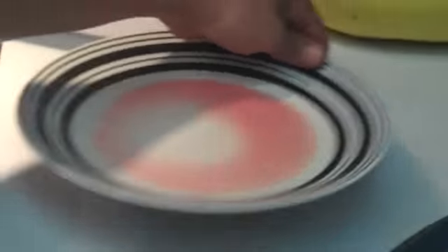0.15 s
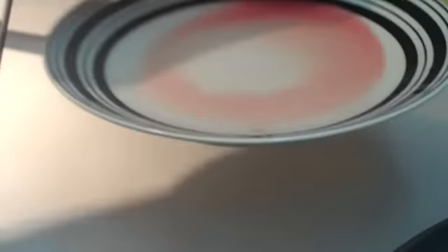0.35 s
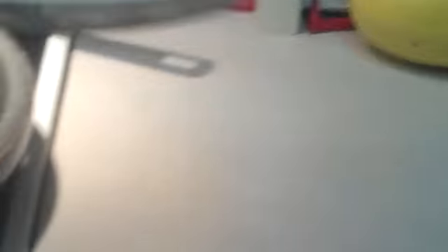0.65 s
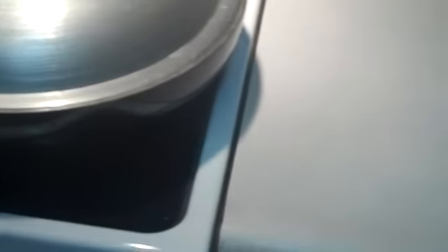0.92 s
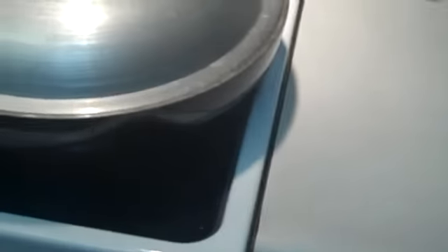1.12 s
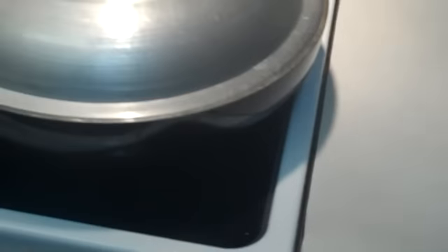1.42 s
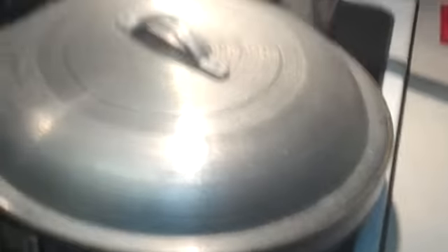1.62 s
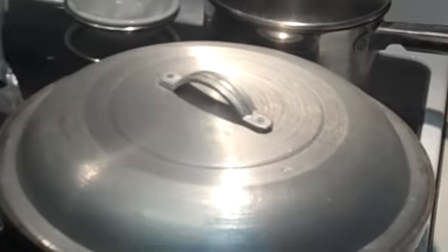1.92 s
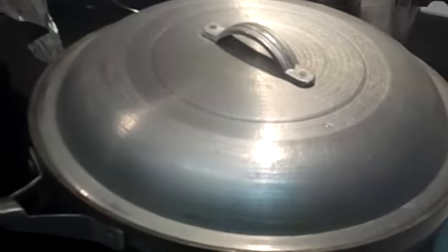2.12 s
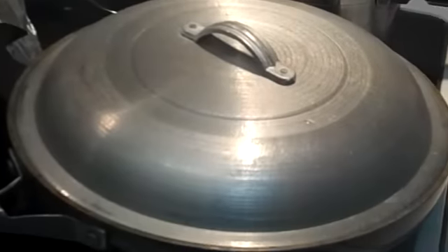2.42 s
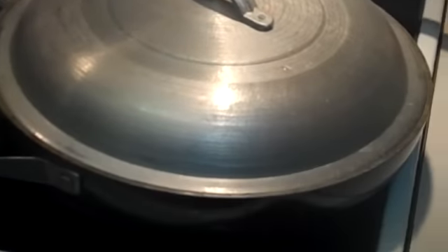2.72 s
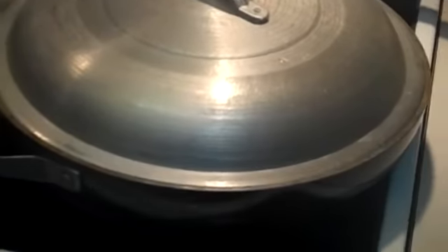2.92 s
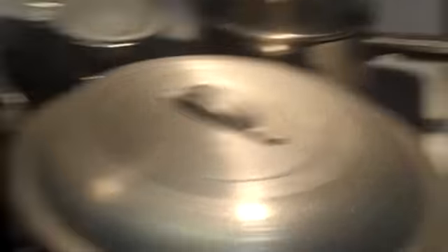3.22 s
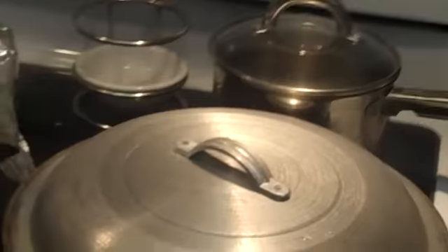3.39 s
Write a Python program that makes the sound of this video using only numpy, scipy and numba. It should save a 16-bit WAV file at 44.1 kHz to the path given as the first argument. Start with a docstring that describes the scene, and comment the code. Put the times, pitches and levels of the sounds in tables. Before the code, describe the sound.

Fish sizzles steadily in a lidded pan, with irregular pops and sharp fat spits, in a small kitchen. Light crockery knocks come early; a loud double plate clang lands near the end. Close phone microphone, dull highs.

```python
"""Fish fries under a metal lid in a small kitchen, heard by one phone microphone.
From the start: a dense fizz of noise and tiny bubbles, larger bubbles that pop as rising, dying sines, noise
puffs of spitting fat and dull knocks of crockery (resonated noise); a low sine hum comes and goes, handling
rumble fades, a fan hums faintly. Near the end a plate is set down with a double clang of damped modes."""
import sys
import numpy as np
from scipy import signal
from scipy.fft import rfft, irfft
from scipy.io import wavfile
from scipy.ndimage import uniform_filter1d
from numba import njit

SR = 44100
rng = np.random.default_rng(int(sys.argv[2]) if len(sys.argv) > 2 else 0)


def linear_from_db(decibels):
    """Turn decibels (scalar or array-like) into linear amplitude factors; 0 gives 1."""
    return 10 ** (np.asarray(decibels, float) / 20)


def master_out(mix):
    """Clip the mix to full scale and print it as 16-bit PCM to the path in sys.argv[1]."""
    frames = np.transpose(np.atleast_2d(mix))
    ceiling = np.clip(frames, -1, 1)
    pcm = np.round(ceiling * 32767).astype(np.int16)
    wavfile.write(sys.argv[1], SR, pcm)


N = 156555
T = np.arange(N) / SR
FRAME = dict(window="cosine", nperseg=2048, noverlap=1024)


def column(table, at, log=False):
    """Interpolate the second column of a table over its first, on a log axis if asked."""
    x, y = np.array(table, float).T[:2]
    if log:
        return np.interp(np.log(at + 1), np.log(x + 1), y)
    return np.interp(at, x, y)


def unit(x):
    """Scale to rms 1."""
    return x / np.sqrt(np.mean(x ** 2))


def band(x, hz, width_hz):
    """Resonance with gain 1 at its centre."""
    return signal.lfilter(*signal.iirpeak(hz, hz / width_hz, SR), x)


def band_twice(x, hz, width_hz):
    """The same resonance passed twice: steeper skirts."""
    return band(band(x, hz, width_hz), hz, width_hz)


def fade(t, t60_s):
    """Exponential decay that starts at t = 0."""
    return (t >= 0) * linear_from_db(-60 * np.maximum(t, 0) / t60_s)


def walk(rate_hz, count=N):
    """Random levels held 1 / rate_hz and slewed; spread about 1.8."""
    hold = int(SR / rate_hz)
    levels = np.repeat(rng.standard_normal(count // hold + 2), hold)
    return 1.78 * uniform_filter1d(levels, hold // 3)[rng.integers(hold):][:count]


@njit
def bubbles(start, hz, t60_s, size, glide):
    """Each bubble is a dying sine whose pitch rises by the share glide over its t60."""
    out = np.zeros(N)
    for k in range(len(start)):
        n, phase = int(t60_s[k] * SR), 0.
        for i in range(min(n, N - start[k])):
            phase += 2 * np.pi * hz[k] * (1 + glide * i / n) / SR
            out[start[k] + i] += size[k] * np.sin(phase) * 10 ** (-3 * i / n)
    return out


def fizz():
    """Hiss and tiny bubbles in the colour of the lidded pot; narrow patches sink far but swell only a little."""
    # colour of the fizz: pitch_hz, gain_db
    colour = [(65, -51.5), (120, -27), (204, -10), (258, -13), (340, -19), (420, -12), (539, -12.5),
              (586, -14), (700, -6.5), (1310, -8.5), (1400, -10.5), (1740, -8), (2430, -6.5), (3000, -5.5),
              (3500, -6.5), (4600, -4.5), (5280, 2.5), (6000, -5), (7800, -32.5), (13200, -120)]
    # how hard the oil fries: start_s, relative level_db
    frying = [(0, -41.5), (.24, -40.5), (.4, -43), (.52, -43), (.8, -40), (.88, -42.5), (1.05, -41),
              (1.18, -43), (1.5, -40.5), (1.58, -43.5), (1.74, -40.5), (1.84, -39.5), (2.0, -40.5),
              (2.1, -41), (2.28, -41.5), (2.44, -40.5), (2.66, -42), (2.78, -41), (2.9, -42.5),
              (3.55, -40.5)]
    tiny_per_s, tiny_spread_db, tiny_db, tiny_cycles = 900, 2.2, -4.5, 5
    flicker_db, flicker_width_hz, surge_db, surge_rate_hz = 5, 260, 1.8, 25

    place, pitch, rarity = rng.random((int(tiny_per_s * N / SR), 3)).T
    hz = 500 * 13 ** pitch
    size = linear_from_db(-tiny_spread_db * np.log(rarity + 0.007))
    tiny = bubbles((place * N).astype(np.int64), hz, tiny_cycles / hz, size, 0.59)

    # flatten the bubbles' average spectrum
    f, _, tiny_spec = signal.stft(tiny, SR, **FRAME)
    average = np.sqrt(uniform_filter1d(np.mean(abs(tiny_spec) ** 2, 1), size=20))
    tiny_spec = tiny_spec / average[:, None] * (f > 500)[:, None]

    hiss_spec = signal.stft(rng.standard_normal(N), SR, **FRAME)[2]
    hiss_spec = hiss_spec / np.sqrt(np.mean(abs(hiss_spec) ** 2))
    patch = rng.standard_normal(hiss_spec.shape)[(f / flicker_width_hz).astype(int)]
    hiss_spec = hiss_spec * linear_from_db(flicker_db * np.minimum(patch, .7))

    spec = (hiss_spec + linear_from_db(tiny_db) * tiny_spec) * linear_from_db(column(colour, f, True))[:, None]
    level_db = column(frying, T) + 3 + surge_db * np.tanh(walk(surge_rate_hz))
    return unit(signal.istft(spec, SR, **FRAME)[1][:N]) * linear_from_db(level_db)


def pops():
    """Each large bubble bursts as a snap, a main ring, three neighbours just after and a short bright splash."""
    # bursts: start_s, level_db, pitch_hz, t60_s
    bursts = [(0.0154, -37.5, 3070, 0.012), (0.0316, -28, 2910, 0.02), (0.0858, -26, 2065, 0.026),
              (0.1656, -30.5, 3310, 0.036), (0.5897, -28, 2266, 0.022), (0.6516, -33, 1840, 0.025),
              (0.7888, -35, 1980, 0.024), (0.9834, -32, 2100, 0.014), (1.05, -33.5, 1780, 0.025),
              (1.4573, -32, 2728, 0.067), (1.494, -27, 1970, 0.027), (1.6222, -24.5, 2440, 0.012),
              (1.6397, -30, 1883, 0.051), (1.6931, -29, 2825, 0.013), (1.7506, -26, 2210, 0.008),
              (1.9644, -27.5, 1812, 0.041), (2.1366, -25, 2075, 0.025), (2.167, -27, 2920, 0.011),
              (2.387, -26, 2316, 0.026), (2.4344, -37, 2120, 0.033), (2.5063, -26, 2120, 0.021),
              (2.539, -33.5, 1925, 0.024), (2.5805, -33, 2190, 0.039), (2.7003, -31.5, 2010, 0.011),
              (2.753, -23, 2120, 0.027), (2.9544, -25.5, 2120, 0.033), (3.0869, -26.5, 2685, 0.021),
              (3.1296, -26, 3250, 0.021), (3.155, -24, 1830, 0.028), (3.482, -30, 2120, 0.025),
              (3.5313, -28, 2830, 0.0091)]
    glide, snap_db, snap_cycles = 0.075, -0.7, 3.5
    cluster_s, cluster_spread = 0.0065, .22
    splash_db, splash_t60_s, splash_hz = -8.5, .06, 3220
    after_fizz_hz, after_fizz_db = 5400, -6.5

    s, db, hz, t60_s = np.array(bursts).T
    start = (s * SR).astype(np.int64)
    ring = bubbles(start, hz, t60_s, linear_from_db(db), glide)
    ring += bubbles(start, 1.15 * hz, snap_cycles / hz, linear_from_db(db + snap_db), glide)
    for late, off in rng.random((3, 2, len(s))):
        near_start = ((s + cluster_s * late) * SR).astype(np.int64)
        near_hz = hz * (1 + cluster_spread * (3 * off - 1))
        ring += bubbles(near_start, near_hz, t60_s * 0.69, linear_from_db(db - 2.5), glide)

    splash = sum(linear_from_db(d + splash_db) * fade(T - a, splash_t60_s) for a, d in zip(s, db))
    noise = rng.standard_normal(N)
    bright = unit(band(noise, splash_hz, 4000.0))
    bright = bright + linear_from_db(after_fizz_db) * unit(band(noise, after_fizz_hz, 720.0))
    return ring + splash * bright


def spits():
    """Fat spits against the lid: each spit is a sharp puff of noise round its own centre."""
    # spits: start_s, level_db, centre_hz
    puffs = [(0.163, -23.5, 5420), (0.2416, -28.5, 5360), (0.3192, -34, 5400), (0.7595, -27.5, 5160),
             (0.8006, -24.5, 5400), (1.0859, -28, 5530), (1.2308, -30, 5280), (1.3882, -30, 5100),
             (1.5772, -29, 4620), (1.639, -22, 5120), (1.7013, -20.5, 5280), (1.8731, -27, 5960),
             (2.0617, -26, 4880), (2.137, -26.5, 4770), (2.3254, -25, 5180), (2.3825, -31, 5160),
             (2.5043, -23.5, 4550), (2.5381, -19.5, 5110), (2.7503, -20.5, 4860), (2.8557, -22, 5200),
             (2.8948, -29, 5100), (3.0856, -29.5, 4100)]
    t60_s, width_hz, crest_db = 0.029, 1300, 5.5
    noise = rng.standard_normal(N)
    return sum(linear_from_db(db - crest_db) * fade(T - s, t60_s) * unit(band(noise, hz, width_hz))
               for s, db, hz in puffs)


def knocks():
    """Handled crockery: short bursts of noise through broad low resonances."""
    # knocks: start_s, level_db, t60_s
    strokes = [(0.035, -29.5, 0.13), (0.063, -32, 0.19), (0.553, -24, 0.091), (0.818, -32, 0.11),
               (1.316, -40, 0.18), (1.697, -28, 0.095), (1.757, -31.5, 0.056), (3.065, -35.5, 0.18)]
    # what they ring with: pitch_hz, width_hz (of one of two passes), level_db
    resonances = [(188, 84, -2.5), (292, 28, -6.5), (517, 130, -1.5), (702, 120, 4.5), (946, 100, 2.5),
                  (1170, 440, 1.5)]
    noise = rng.standard_normal(N)
    body = unit(sum(linear_from_db(db) * unit(band_twice(noise, hz, w)) for hz, w, db in resonances))
    return body * sum(linear_from_db(db - 5) * fade(T - s, t60_s) for s, db, t60_s in strokes)


def clang():
    """Each plate contact tops up the modes with its own weights; they waver and buzz over a rattle and a thud."""
    # plate touches, lands, rocks and lands again: start_s, level_db, push_s
    contacts = [(3.224, -31, 0.00005), (3.239, -15, 0.00025), (3.243, -11.5, 0.00012),
                (3.253, -11.5, 0.00011), (3.255, -13, 0.000097), (3.276, -21, 0.0001),
                (3.296, -12, 0.000086), (3.310, -16, 0.00018), (3.328, -18.5, 0.00016),
                (3.343, -23.5, 0.0002)]
    # modes of plate and worktop: pitch_hz, level_db, t60_s, rocked_db (change once on its other edge)
    modes = [(170, -14, .3, 1), (226.2, -9.5, 0.18, 1.5), (269.7, -3, .22, -6), (305.5, -7, 0.42, -5),
             (385.4, -2.5, 0.19, -3), (401, -2, 0.25, -1.5), (440, -9.5, .2, -0.5), (465, -8, .3, 1),
             (503.5, -4.5, 0.22, 4.5), (542.4, -8, 0.17, 4.5), (689, -0.7, .36, 0), (724, -10, 0.22, 1),
             (818, -8, 0.25, 0.5), (931, -8, 0.24, 1.5), (1116, -0.5, 0.38, 1), (1490, -9.5, 0.52, -0.5),
             (1517, -11, 0.23, 1.5), (1665, -9.5, 0.26, 1), (1780, -4.5, 0.17, 0), (2120, -4, 0.17, -2),
             (2190, -5, 0.22, 0), (2414, -4.5, 0.11, -3), (2720, -4.5, 0.27, -6), (2860, -12, .25, 5),
             (2990, -6, .25, -0.5), (3440, -11, .3, 7), (3820, -15, .2, 11), (4511, -7, .25, 1.5),
             (4860, -4.5, 0.25, -3.5), (4970, -5.5, 0.097, -2), (5173, -3, .13, -12), (5400, -5, .17, -5),
             (5960, -7, .15, -7)]
    rocked_s, damped_s, damped_t60_s = 3.285, 3.41, 0.058
    rattle_db, rattle_t60_s, rattle_hz = -18.5, 0.1, 1000
    thud_hz, thud_db, thud_t60_s = 35, -47.5, 0.96
    waver_db, waver_rate_hz, rise_s = 3.5, 69.7, 0.00076
    buzz_db, buzz_width = -1.2, .11  # against the tone; share of the mode's pitch

    first = int(contacts[0][0] * SR)
    t = T[first:]
    rattle = unit(band_twice(rng.standard_normal(len(t)), rattle_hz, 3000.0))
    out = sum(linear_from_db(db + rattle_db) * fade(t - s, rattle_t60_s) for s, db, push_s in contacts) * rattle

    rise = 1 / (rise_s * SR)
    for hz, mode_db, t60_s, rocked_db in modes:
        decays = []
        for weight, (s, db, push_s) in zip(rng.standard_normal(len(contacts)), contacts):
            hit = linear_from_db(db + 1.56 * weight + rocked_db * (s > rocked_s))
            softness = 1 + (hz * push_s) ** 2  # a longer push excites high modes less
            decays.append(hit / softness * fade(t - s, t60_s))
        env = signal.lfilter([rise], [1, rise - 1], np.max(decays, axis=0))
        buzz = unit(band_twice(rng.standard_normal(len(t)), hz, buzz_width * hz))
        waver = linear_from_db(waver_db * walk(waver_rate_hz, count=len(t)))
        tone = waver * np.sin(2 * np.pi * (hz * t + rng.random()))
        out += linear_from_db(mode_db - 14.0) * env * (tone + linear_from_db(buzz_db) * buzz)

    thud = unit(band(rng.standard_normal(len(t)), thud_hz, 40.))
    out += linear_from_db(thud_db) * fade(t - contacts[2][0], thud_t60_s) * thud
    damping = linear_from_db(-60 * np.maximum(t - damped_s, 0) / damped_t60_s)
    return np.r_[np.zeros(first), out * damping]


def low_hum():
    """A low sine that switches on and off with smoothed edges."""
    # spells: start_s, length_s, rms_db
    spells = [(0.153, 0.27, -67), (0.41, 0.093, -63.5), (0.615, 0.092, -66.5), (0.75, 0.04, -63),
              (0.92, 0.051, -66), (1.01, 0.033, -61.5), (1.074, 0.13, -65), (1.32, 0.052, -64),
              (2.819, 0.04, -66.5)]
    hum_hz = 47.3
    gate = sum(linear_from_db(db) * ((T > s) & (T < s + length_s)) for s, length_s, db in spells)
    return np.sqrt(2) * np.sin(2 * np.pi * hum_hz * T) * uniform_filter1d(gate, size=700)


def rumble():
    """The phone being handled: low noise of randomly wavering level."""
    # level before the wavering: start_s, rms_db
    handling = [(0, -62.5), (.5, -64.5), (1.2, -68), (1.5, -87.5), (3.55, -85.5)]
    noise = unit(band(rng.standard_normal(N), 129, 92.0))
    return noise * linear_from_db(column(handling, T) + 2.9 * walk(9.5))


def fan():
    """Fan tones: narrow noise bands, so they waver."""
    # tones: pitch_hz, width_hz (of one of two passes), rms_db
    tones = [(211.2, 34, -62.5), (418.2, 25, -63.5)]
    return sum(linear_from_db(db) * unit(band_twice(rng.standard_normal(N), hz, w)) for hz, w, db in tones)


def kitchen(hits):
    """Add the room's tail, decaying low-passed noise, then tilt the spectrum."""
    room_t60_s, room_db, room_top_hz = .2, -13.5, 4070
    t = T[:SR // 2]
    tail = signal.lfilter(*signal.butter(1, room_top_hz, fs=SR), rng.standard_normal(len(t)))
    tail = tail * fade(t - .004, room_t60_s)
    wet = signal.fftconvolve(hits, tail / np.sqrt(np.sum(tail ** 2)))[:N]
    tilt = [(30, -17.5), (150, -1.5), (6500, -2.0), (9000, -16.0)]  # pitch_hz, gain_db
    gain = linear_from_db(column(tilt, np.fft.rfftfreq(N, 1 / SR), True))
    return irfft(rfft(hits + linear_from_db(room_db) * wet) * gain, N)


def scene():
    """Short sounds get the kitchen's tail; steady ones are heard as they are."""
    hits = pops() + spits() + knocks() + clang()
    return (kitchen(hits) + fizz() + low_hum() + rumble() + fan())[None]


def spectral_gate(x):
    """Parts weaker than their spectral neighbourhood drop, leaving thin flickering tones; the top is shut."""
    gate_db, gate_depth_db, gate_low_hz, gate_top_hz = -1.5, -19.5, 110, 6166
    hole_db, hole_depth_db = -4, -19  # wider weak patches, in quiet moments only
    loud_db, loud_eases = 9, 0.22  # loud: above the bin's median; share of the depth left there

    f, _, z = signal.stft(x, SR, **FRAME)
    near, patch = (np.sqrt(uniform_filter1d(abs(z) ** 2, size=k, axis=0)) for k in (40, 9))
    quiet = near < linear_from_db(loud_db) * np.median(near, axis=1)[:, None]
    weak = abs(z) < linear_from_db(gate_db) * near
    hole = (patch < linear_from_db(hole_db) * near) * quiet
    gain_db = gate_depth_db * weak * np.where(quiet, 1, loud_eases) + hole_depth_db * hole
    gain_db *= (f > gate_low_hz)[:, None]
    top_hz = gate_top_hz + 150 * rng.standard_normal(z.shape[1])
    gain_db = gain_db - 64 * (f[:, None] > top_hz)
    return signal.istft(z * linear_from_db(gain_db), SR, **FRAME)[1][:N]


def self_noise(x):
    """Faint coloured hiss whose level wavers and rises with the sound."""
    # colour: pitch_hz, gain_db
    colour = [(30, -17), (300, -0.5), (6500, 4.5), (7800, 1.5), (8600, -13), (9200, -59)]
    level_db, follows = -59, 0.46
    gain = linear_from_db(column(colour, np.fft.rfftfreq(N, 1 / SR), True))
    hiss = irfft(rfft(rng.standard_normal(N)) * gain, N)
    loud = np.sqrt(uniform_filter1d(x ** 2, size=900) + 1e-12)
    return unit(hiss) * linear_from_db(level_db + 2 * walk(20)) * (loud / np.median(loud)) ** follows


def band_limit(x):
    """A steep low-pass at the top of the band."""
    return signal.sosfilt(signal.butter(12, 8820, fs=SR, output="sos"), x)


def record(dry):
    """Weak spectral parts drop out, leaving thin flickering tones; then hiss is added."""
    out = spectral_gate(dry[0])
    out = out + self_noise(out)
    return band_limit(out[None])


dry = scene()
out = record(dry)
master_out(out)
```